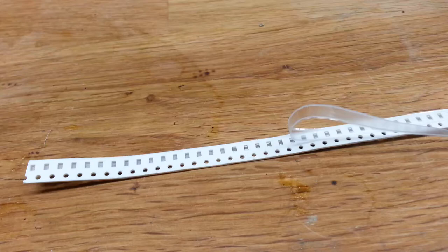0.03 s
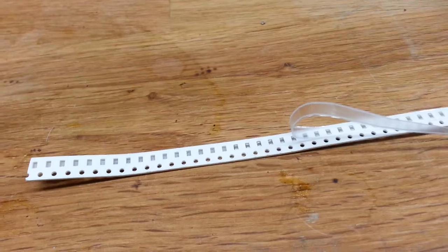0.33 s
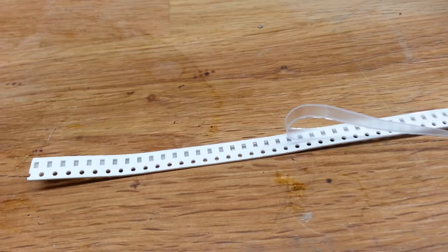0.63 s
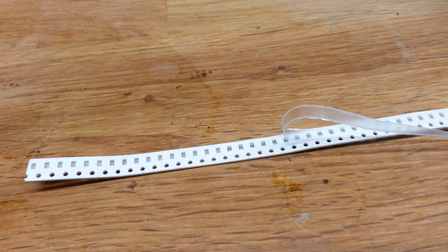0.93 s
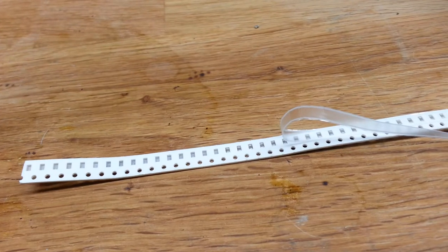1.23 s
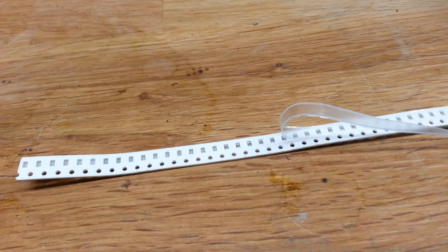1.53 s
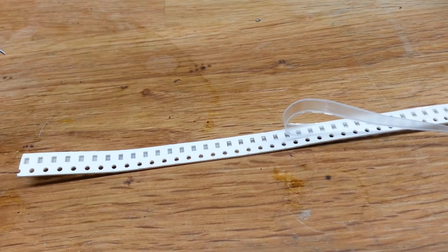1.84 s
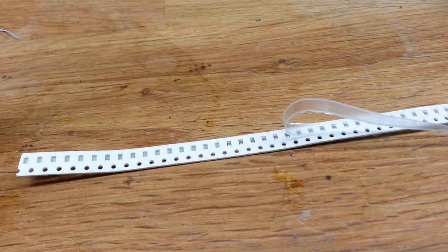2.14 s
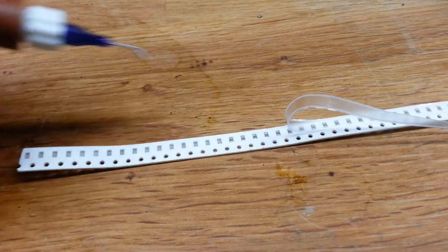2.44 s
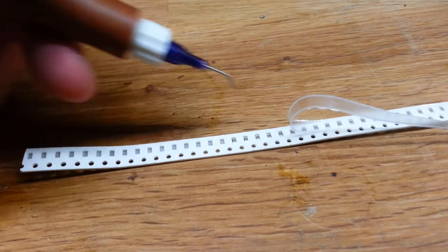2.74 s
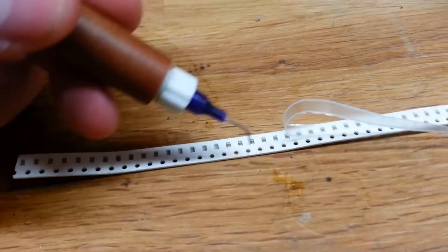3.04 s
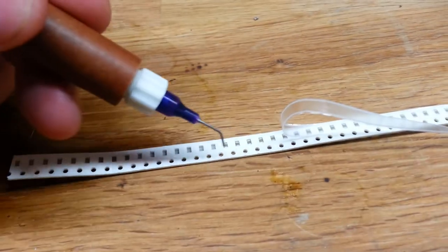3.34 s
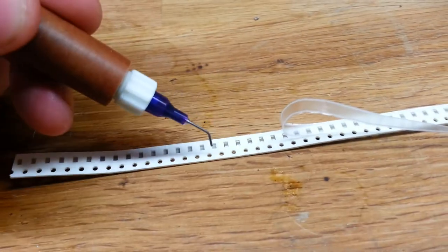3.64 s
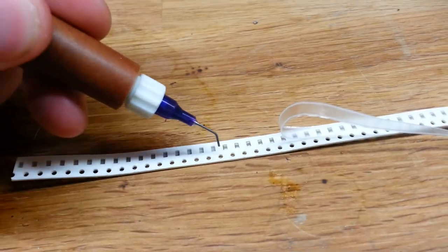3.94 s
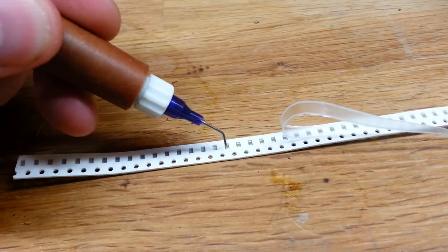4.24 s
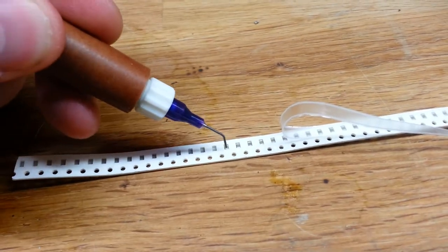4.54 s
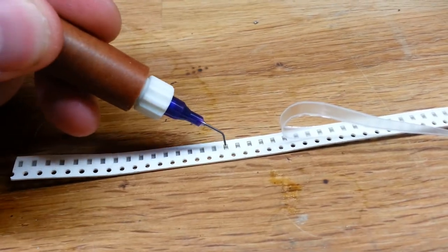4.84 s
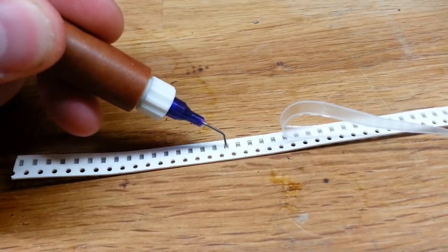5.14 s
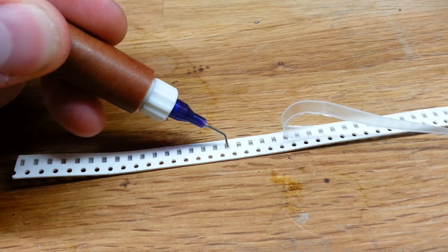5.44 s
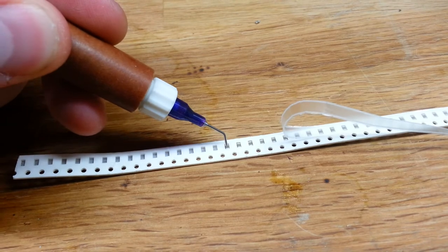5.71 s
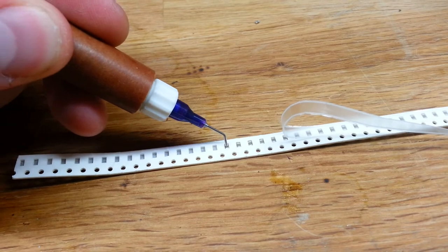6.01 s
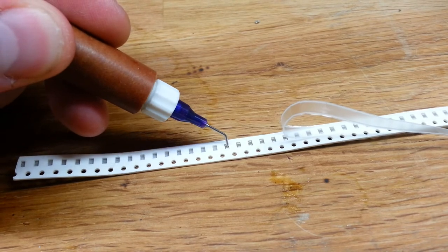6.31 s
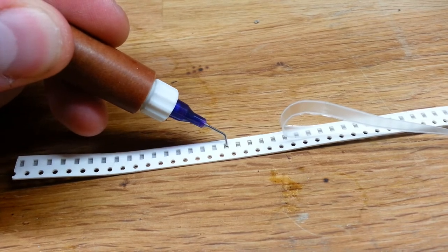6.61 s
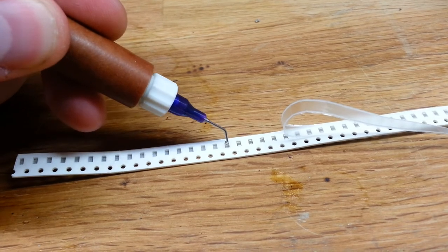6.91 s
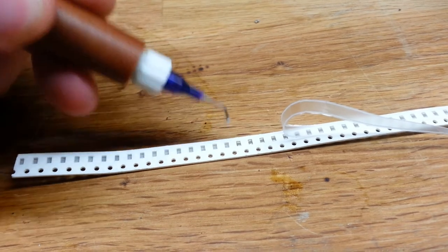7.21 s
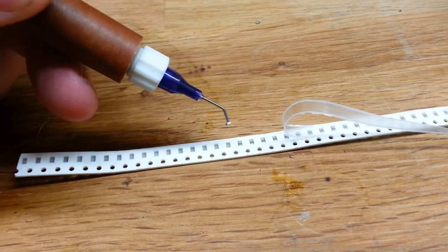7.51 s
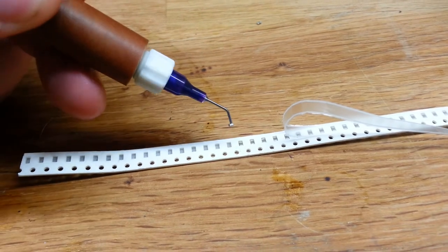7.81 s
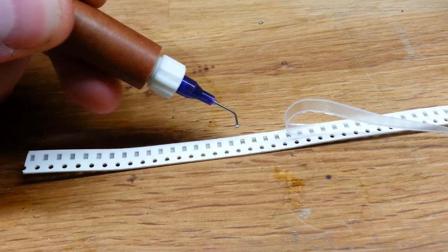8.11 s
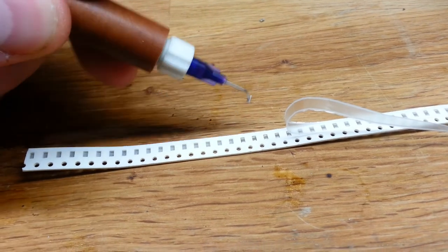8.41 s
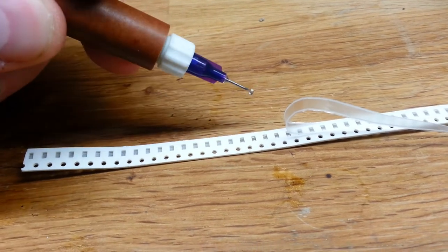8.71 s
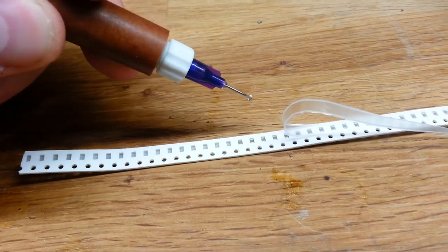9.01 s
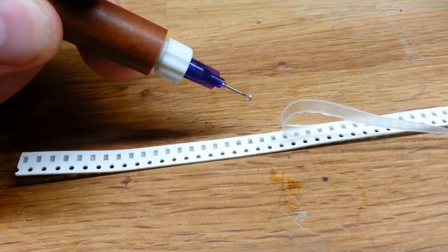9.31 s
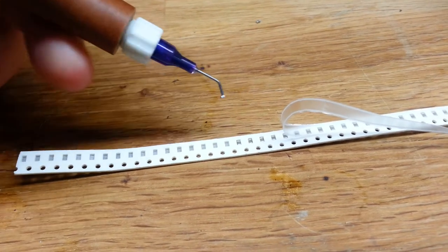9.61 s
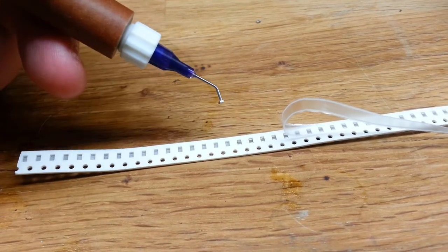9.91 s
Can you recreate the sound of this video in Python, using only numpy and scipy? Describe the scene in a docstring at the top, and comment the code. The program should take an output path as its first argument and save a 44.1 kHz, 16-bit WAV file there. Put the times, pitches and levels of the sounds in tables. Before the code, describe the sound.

Close by on an indoor bench, a little diaphragm pump switches on and buzzes evenly, its low hum topped by thin, high chatter and a soft rush of air. The rattle shifts in tone as a hand comes near. Later the suction tip closes on a part, and the buzz turns rough and strained, then hollower, a little softer and slightly higher. A thin whistle appears, followed by a steady drone as the pump keeps running.

```python
"""A small diaphragm vacuum pump starts abruptly on a wooden bench, feeding a pick-up pen for tiny parts.
Each stroke hums in the housing, thumps one valve, flutters and chirps through the other, and shakes a
tick and a bright rattle out of the casing. By three seconds a nearby hand has recoloured the rattle;
later the sound jumps once, like a splice. Near seven seconds the needle seals on a part: the motor
labours, then speeds up as the vacuum builds and the valves quieten. A whistle joins, and last a drone."""
import sys
import numpy as np
from scipy import signal
from scipy.fft import rfft, irfft, next_fast_len
from scipy.io import wavfile
from scipy.ndimage import map_coordinates

SR = 44100
rng = np.random.default_rng(int(sys.argv[2]) if len(sys.argv) > 2 else 0)


def transcribe(u):
    """Save the signal u as a 16-bit wav file named by the first command-line argument.

    u: samples, shape (n,) or (channels, n), limited to [-1, 1]; the rate is SR.
    q: integer samples, one column per channel.
    """
    v = np.clip(np.atleast_2d(u).T, -1, 1)
    q = np.round(v * 32767).astype(np.int16)
    wavfile.write(sys.argv[1], SR, q)


N = 438794
TIME = np.arange(N) / SR
# The part jostles on the needle: the wash swells and the valves beat unevenly.
SEATING = dict(start_s=6.9, attack_s=0.14, end_s=7.08, release_s=0.18)


def from_db(db):
    """Amplitude grows tenfold with every 20 decibels."""
    return 10 ** (np.asarray(db) / 20)


def rms_one(x):
    """Normalisation to unit mean power."""
    return x / np.sqrt(np.mean(x ** 2) + 1e-20)


def in_time(rows):
    """Linear interpolation of each column at every sample; the first column is time."""
    seconds, *columns = np.transpose(rows)
    return [np.interp(TIME, seconds, column) for column in columns]


def ramp(start_s, length_s):
    """A linear transition from 0 to 1."""
    return np.clip((TIME - start_s) / length_s, 0, 1)


def spell(start_s, attack_s, end_s, release_s):
    """A trapezoidal envelope: attack, hold and release, between 0 and 1."""
    return ramp(start_s, attack_s) * (1 - ramp(end_s, release_s))


def burst(turn, length_turns):
    """Exponential decay, excited anew at the start of each turn."""
    return np.exp(-(turn % 1) / length_turns)


def drift(rate):
    """Smooth random fluctuation through `rate` new values a second; rms 1."""
    knots = rng.standard_normal(4000)
    return rms_one(np.interp(TIME * rate, np.arange(len(knots)), knots))


def blend(layers, state):
    """A linear crossfade from each layer to the next as the state counts up."""
    return sum(layer * np.clip(1 - np.abs(state - k), 0, 1) for k, layer in enumerate(layers))


def placed(x, left_db, lead_ms):
    """Level and time differences give direction: the left is louder by left_db and early by lead_ms."""
    late = np.interp(TIME - lead_ms / 1000, TIME, x)
    return np.array([x * from_db(left_db / 2), late * from_db(-left_db / 2)])


def coloured(x, hz, db):
    """Spectral shaping of a white signal, falling 19 dB an octave past both ends; rms 1."""
    size = next_fast_len(N)
    octave, points = np.log2(np.arange(size // 2 + 1) * SR / size + 1), np.log2(hz)
    octaves_outside = np.abs(octave - np.clip(octave, points[0], points[-1]))
    gain = from_db(np.interp(octave, points, db) - 19 * octaves_outside)
    return rms_one(irfft(rfft(x, size) * gain, size)[..., :N])


def strokes(table, turn, state, skirt_db, sweep_turns=0, size=2048):
    """Periodic blows excite harmonics (multiples are rounded); state blends the table's spectra."""
    orders, *colours = np.transpose(table)
    orders, k = np.round(orders), np.arange(size // 2 + 1)
    octaves_outside = np.abs(np.log2(np.maximum(k, .5) / np.clip(k, orders[0], orders[-1])))
    rolloff_db = np.minimum(skirt_db * octaves_outside, 30)
    gains = [from_db(np.interp(k, orders, db) - rolloff_db) for db in colours]
    # A struck part rings right after the blow: minimum phase.
    cepstrum = irfft(np.log(np.mean(gains, axis=0)))
    phase = rfft(2 * cepstrum[:size // 2], size).imag
    phase -= np.pi * sweep_turns * k ** 2  # each harmonic sounds sweep_turns after the one below
    cycles = [rms_one(irfft(gain * np.exp(1j * phase) * (octaves_outside == 0))) for gain in gains]
    place = turn % 1 * size
    return blend([np.interp(place, np.arange(size + 1), np.append(c, c[0])) for c in cycles], state)


def repeating_noise(turn, memory_turns, size=1024):
    """Noise correlated from turn to turn, its pattern forgotten exponentially."""
    keep = np.exp(-1 / memory_turns)
    fresh = rng.standard_normal((int(turn[-1]) + 3, size))
    pattern, _ = signal.lfilter([np.sqrt(1 - keep ** 2)], [1, -keep], fresh[1:], axis=0,
                                zi=keep * fresh[:1])
    return rms_one(map_coordinates(pattern.ravel(), [turn * size], order=1))


def wash(strain):
    """Broadband noise: a rough wash under the pump's strokes, swelling as the needle seals."""
    # Spectrum of the wash. Each row: frequency in Hz, relative density in dB.
    spectrum = [(29, -11), (86, -7), (143, -5), (200, -4.5), (315, -1.5), (372, 0.5), (544, -5.5),
                (830, -4.5), (1230, -1.5), (1688, -2.5), (2089, -21), (4000, -8.5), (12000, -42)]
    mid, side = coloured(rng.standard_normal((2, N)), *np.transpose(spectrum))
    level_db = -44 + 3.5 * strain + 3 * spell(**SEATING)
    return from_db(level_db) * (mid + from_db(-1.0) * np.array([side, -side]))


def whistle(turn, load, harmonic=121, onset_load=1.9):
    """One high harmonic of the stroke rate stands out of the casing as the vacuum completes."""
    tone = np.sqrt(2) * np.sin(2 * np.pi * harmonic * turn) * from_db(-45.5 + 2 * drift(12))
    return placed(tone * np.sqrt(np.clip(load - onset_load, 0, 1)), left_db=-3, lead_ms=0.01)


def tick(turn, load):
    """Impact excitation: each thump draws the same short, high response from the casing."""
    # Spectrum of the tick. Each row: multiple of the stroke rate, relative level in dB.
    harmonics = [(37, -6.5), (40, -5), (44, -5.5), (48, 3.5), (50, -11.5), (52, -17)]
    ticks = strokes(harmonics, turn, 0, skirt_db=8) * from_db(-48.5 - 1.5 * load)
    return placed(ticks, left_db=2, lead_ms=0.03)


def chirp(turn, load, delay, pitch_hz=5840, wander_hz=170):
    """A flow tone: air whistles briefly through the reed on each stroke, uneven in pitch and strength."""
    tone = np.sin(2 * np.pi * np.cumsum(pitch_hz + wander_hz * drift(80)) / SR)
    chirps = rms_one(tone * burst(turn - delay, length_turns=0.18) * from_db(2 * drift(40)))
    return placed(chirps * from_db(-42.5 - 2 * load), left_db=6, lead_ms=0.011)


def casing_colour(points_hz, db, side):
    """The casing's resonances raise narrow peaks on a broad spectrum; returns Hz and dB."""
    # Casing modes. Each row: frequency in Hz, half width in Hz, left and right peak heights in dB.
    modes = [(2733, 21, 9, 11), (3856, 46, 7, -3), (4484, 75, 8.5, -14), (5677, 24, 4.5, 16.5),
             (6360, 140, 2.5, 0.5), (7210, 44, 8.5, 7)]
    hz = np.geomspace(points_hz[0], points_hz[-1], 900)
    peaks = sum(heights[side] / (1 + ((hz - centre) / width) ** 2) for centre, width, *heights in modes)
    return hz, np.interp(np.log(hz), np.log(points_hz), db) + peaks


def rattle(turn, delay, repeating_share=0.67):
    """Forced vibration: both valve blows shake the casing into chatter, coloured apart for each side."""
    # Course of the rattle. Each row: time in seconds, state (0 bench clear, 1 hand near, 2 full vacuum).
    states = [(2.3, 0.23), (3.1, 1.03), (7.7, 1.02), (8.9, 2.08)]
    # Strength of the rattle by state. Each row: level in dB, excess of left over right in dB.
    levels = [(-30, 1.5), (-30, 4.5), (-32.5, 2.3)]
    # Rattle spectra. Each row: frequency in Hz, then left and right relative density in dB per state.
    spectra = [(1990, -19, -8.5, -11, -11, 0.5, -10), (2380, -6.5, -22, -13, -15.5, -3.5, -4),
               (2810, -7.5, -14, -16.5, -8, -3.5, -19), (2950, -19, -17, -17, -19, -2.5, -13),
               (3700, -17.5, -24, -17, -13.5, -4.5, -14), (4080, -18, -34, -20, -40, -11, -12),
               (4640, -13.5, -36, -17, -15, -3, -18), (6180, 0.5, -18, -0.5, -14, 4, -17),
               (6150, -10, -9.5, -30.5, -2, -25, 1), (7680, -13, -5, -13, -4.5, -5, -3),
               (8000, -29, -11.5, -28, -5, -14, -4), (8800, -48, -16, -71, -12.5, -47, -10),
               (10500, -11, -13.5, -13.5, -7, -8.5, -5.5), (12180, -37.5, -22, -42, -20.5, -34, -23)]
    state = np.clip(in_time(states)[0], 0, 2)
    level_db, left_db = (blend(column, state) for column in np.transpose(levels))
    hz, *colours = np.transpose(spectra)
    thump_power = 0.75 * burst(turn - .01, length_turns=0.08)
    reed_power = 0.9 * burst(turn - delay, length_turns=0.058)
    shake = rms_one(np.sqrt(0.17 + thump_power + reed_power)) * from_db(0.61 * drift(57))
    sides = []
    for side in range(2):
        repeating = np.sqrt(repeating_share) * repeating_noise(turn, memory_turns=106)
        fresh = np.sqrt(1 - repeating_share) * rng.standard_normal(N)
        chatter = (repeating + fresh) * shake
        layers = [coloured(chatter, *casing_colour(hz, db, side)) for db in colours[side::2]]
        sides.append(blend(layers, state))
    return np.array(sides) * from_db(level_db + np.array([left_db, -left_db]) / 2)


def housing(turn, load):
    """Periodic forcing: the shaft shakes, each stroke sweeps up through the hum, a drone joins last."""
    # Hum of the housing. Each row: multiple of the stroke rate, then relative level in dB with the
    # needle open, sealing, holding and at full vacuum.
    hum_harmonics = [(2, -7.5, -5, -15, -9.5), (3, -16, -1, -8, -8.5), (4, -12, -4, -19.5, -17),
                     (5, -3, -0.5, -5, -15.5), (6, -8.5, 7, -61, 7), (7, 2, -15, 3, -5.5),
                     (8, -6, -3.5, -16.5, -5)]
    # Strength of the hum. Each row: time in seconds, level in dB.
    hum_levels = [(6, -31.5), (6.92, -30), (7.08, -33), (7.35, -31), (7.9, -31), (8.4, -33), (8.95, -36.5),
                  (9.45, -34)]
    # Drone at full vacuum. Each row: multiple of the stroke rate, relative level in dB.
    drone_harmonics = [(7, -1.5), (8, -30), (11, -8.5), (12, -13), (13, -15)]
    hum_db, = in_time(hum_levels)
    colour = ramp(start_s=6.99, length_s=0.23) + np.clip(load - 1, 0, 2)  # shifts as the needle closes
    hum = strokes(hum_harmonics, turn + 0.278, colour, skirt_db=23, sweep_turns=.29)
    hum *= from_db(hum_db + 0.14 * drift(30))
    shaft = from_db(-53) * np.sin(2 * np.pi * turn)
    drone = sum(from_db(db) * np.sin(2 * np.pi * order * turn) for order, db in drone_harmonics)
    drone *= from_db(-34.5) * ramp(start_s=9.36, length_s=0.1)
    return placed(hum + np.sqrt(2) * (shaft + drone), left_db=0.25, lead_ms=0.097)


def valves(turn, load, delay, strain):
    """Alternating pressure thumps one valve, then flutters the reed; both weaken as the air thins."""
    # Valve thump. Each row: multiple of the stroke rate, relative dB open, holding and at full vacuum.
    thump_harmonics = [(8.9, -0.5, -11, -2.5), (10, -3, 2, -13), (10.97, -6, -33, 4.5), (12, 2.5, 1.5, 3),
                       (13, -1.5, -25, -2.5), (14, 4, 7, -19), (15, -6, -29, -1), (16, -9, 2, -11.5),
                       (16.95, -18, -17, 0.5), (18.16, 2, 7, -0.5), (19.08, 0, 0, -27), (20, -23, 0, -15),
                       (21, -5.5, 10, 3), (22, -14.5, -13, 5.5), (23.05, -2, 13.5, -20), (24, -9, 7, 1.5)]
    # Reed flutter. Each row: multiple of the stroke rate, relative dB open and at full vacuum.
    reed_harmonics = [(25.2, -9, -3), (25.97, -11, -1), (26.94, 3, -1), (28, 1.5, -8.5), (29, 5.5, 2),
                      (30.8, 5, -2), (31, 1.5, 2.5), (32, -1.5, -11), (33, -8, -9), (34, -6, -39),
                      (34.9, -50, -13)]
    # A valve slapping its seat. Each row: multiple of the stroke rate, relative level in dB.
    slap_harmonics = [(11, -12), (18, -2.5), (22, -1), (24, -5), (29, 5.5), (33, -6.5), (37, 4.5), (39, 3),
                      (42, -15)]
    seating = spell(**SEATING)
    reed_hits_stop = spell(start_s=7.14, attack_s=0.044, end_s=8.56, release_s=0.18)
    reed_stall = spell(start_s=7.52, attack_s=0.22, end_s=7.8, release_s=0.14)
    holding = ramp(start_s=7.55, length_s=0.51)  # the airflow dies and the thump turns hollow
    jitter_turns = 0.0027 * seating
    turn = turn + jitter_turns * drift(57)
    reed_turn = turn - delay + (0.00076 + jitter_turns) * drift(57)
    opening = from_db(-7.5 * reed_stall + (0.5 + 2 * seating) * drift(57))
    thump = strokes(thump_harmonics, turn, holding + np.clip(load - 2, 0, 1), skirt_db=17.5)
    thump *= from_db(-35 - 2.5 * load + 3.5 * strain + 0.25 * drift(57))
    reed = strokes(reed_harmonics, reed_turn, np.clip(load / 3, 0, 1), skirt_db=7)
    reed *= from_db(-32 - load) * opening
    # Under strain both valves slap; as the pair closes up, its interference comb glides upward.
    thump_slap = strokes(slap_harmonics, turn, 0, skirt_db=5) * np.maximum(strain, reed_hits_stop)
    reed_slap = strokes(slap_harmonics, reed_turn, 0, skirt_db=8) * reed_hits_stop * opening
    slaps = from_db(-33.5) * thump_slap + from_db(-33) * reed_slap
    slaps *= from_db(-3 * load + 1.4 * drift(57))
    return (placed(thump, left_db=-1.1, lead_ms=0.11) + placed(reed, left_db=-3.5, lead_ms=0.13)
            + placed(slaps, left_db=-0.5, lead_ms=0.12))


def scene():
    """Superposition of sources locked in phase to one shaft, over a broad wash."""
    # Motor speed. Each row: time in seconds, strokes per second.
    speeds = [(0, 57.21), (4, 57.26), (6, 57.2), (6.7, 57.08), (7, 56.7), (7.3, 57.08), (7.55, 57.34),
              (7.8, 57.3), (8, 57.85), (8.3, 58.11), (8.8, 58.16), (9.3, 58.42), (9.9, 58.45)]
    # Air line. Each row: time in seconds, load (0 open, 1 sealing, 2 holding, 3 full vacuum).
    loads = [(6.6, 0), (7.0, 0.92), (7.28, 1.22), (7.65, 2.36), (7.9, 2), (8.55, 2.5), (8.65, 2.5),
             (9.3, 3)]
    speed, = in_time(speeds)
    load, = in_time(loads)
    # The motor labours against the closing needle.
    strain = spell(start_s=6.18, attack_s=1.3, end_s=7.59, release_s=0.26)
    delay = 0.33 * np.exp(-0.3414 * load)  # turns from thump to reed, fewer as the vacuum grows
    jump_turns = 0.3 * ramp(start_s=5.424, length_s=0.0037)  # the sound skips part of a stroke
    turn = 0.09 + np.cumsum(speed) / SR + jump_turns
    running = np.maximum(ramp(start_s=0.1136, length_s=0.0056), from_db(-78))
    pump = housing(turn, load) + valves(turn, load, delay, strain) + chirp(turn, load, delay)
    casing = tick(turn, load) + whistle(turn, load) + rattle(turn, delay)
    return running * (pump + casing + wash(strain))


def record(dry, cutoff_hz=12600):
    """An elliptic low-pass filter cuts the top steeply."""
    return signal.sosfilt(signal.ellip(10, .2, 70, cutoff_hz, fs=SR, output="sos"), dry)


dry = scene()
out = record(dry)
transcribe(out)
```